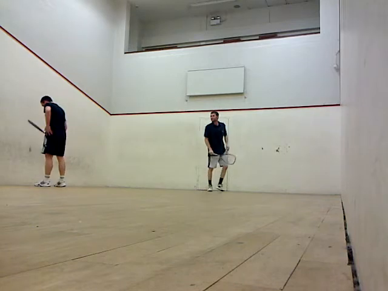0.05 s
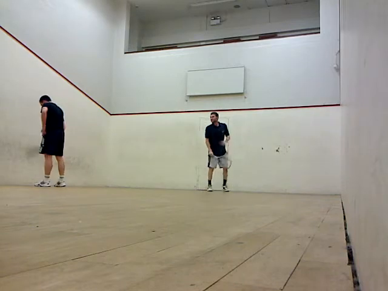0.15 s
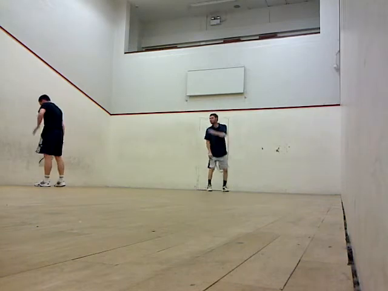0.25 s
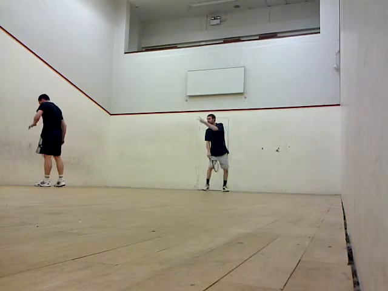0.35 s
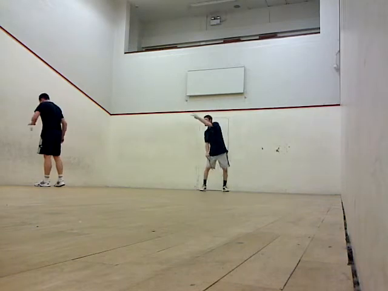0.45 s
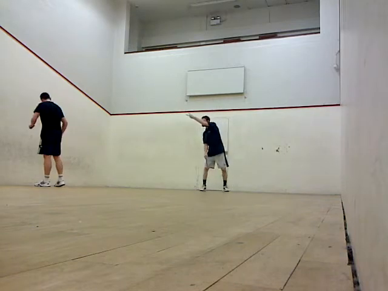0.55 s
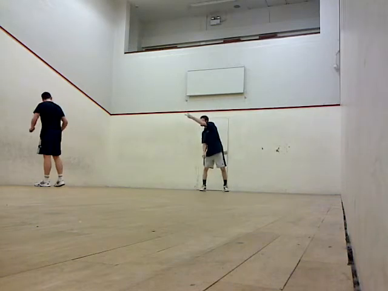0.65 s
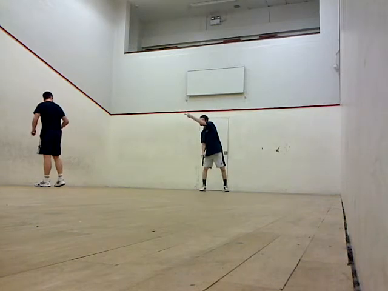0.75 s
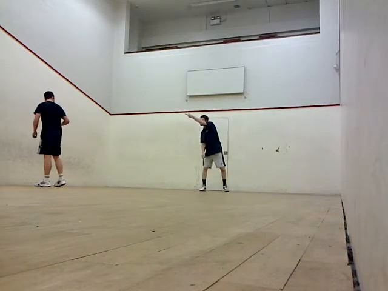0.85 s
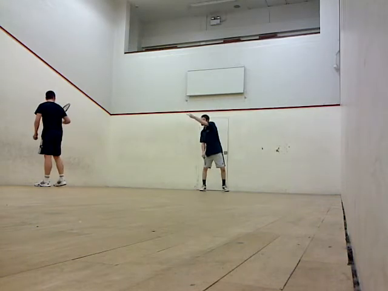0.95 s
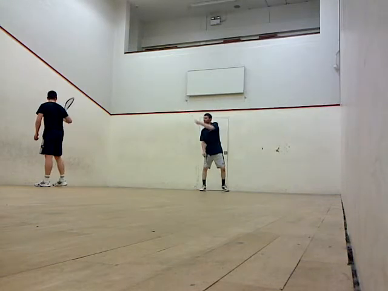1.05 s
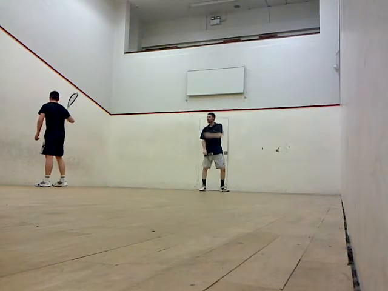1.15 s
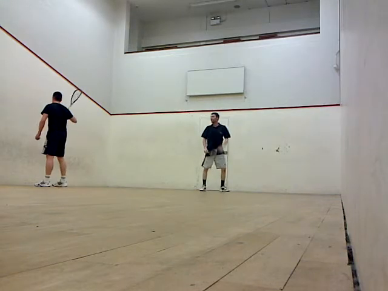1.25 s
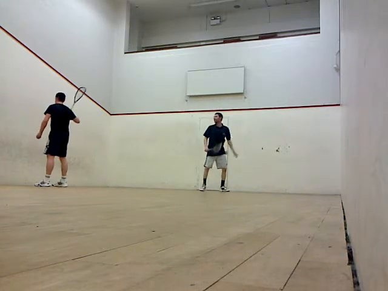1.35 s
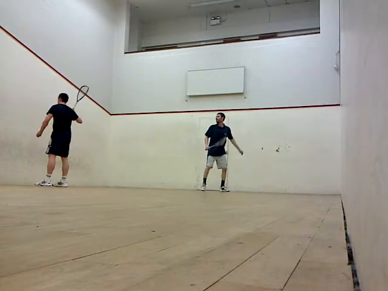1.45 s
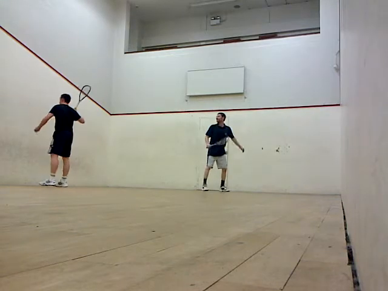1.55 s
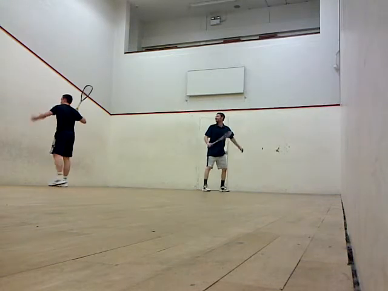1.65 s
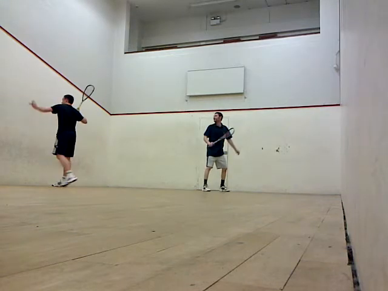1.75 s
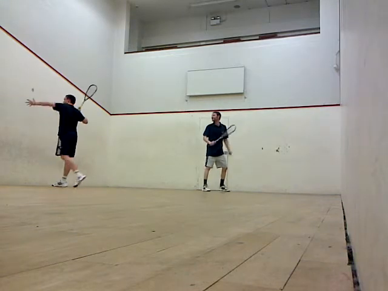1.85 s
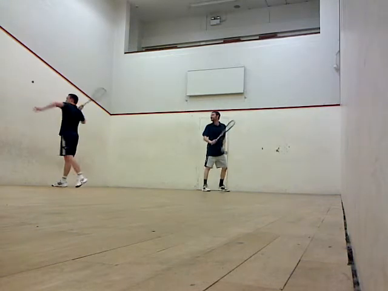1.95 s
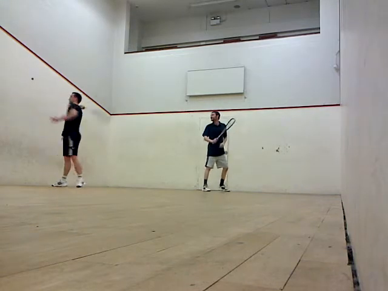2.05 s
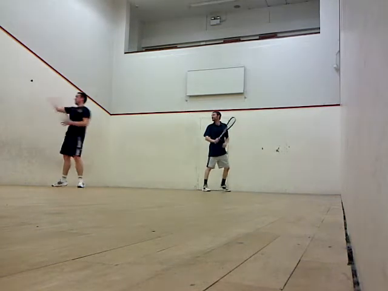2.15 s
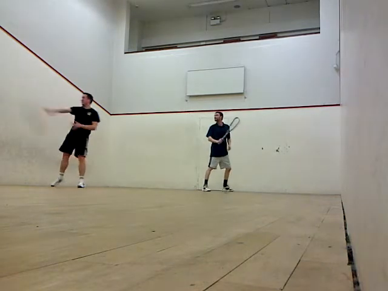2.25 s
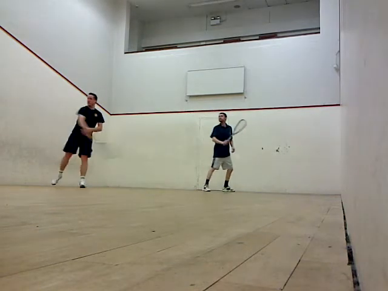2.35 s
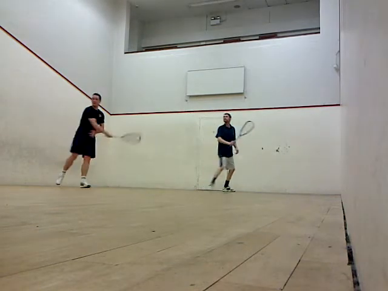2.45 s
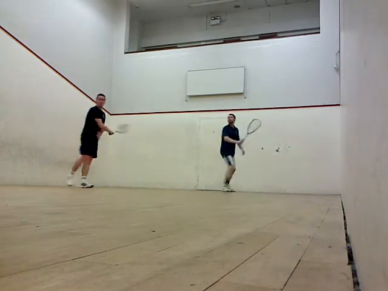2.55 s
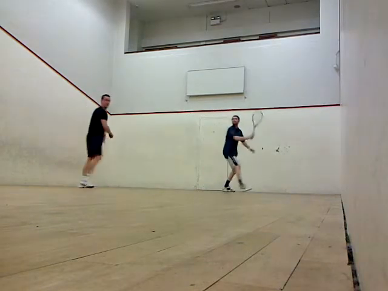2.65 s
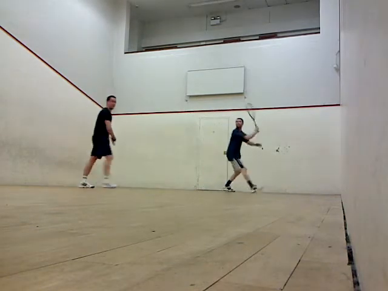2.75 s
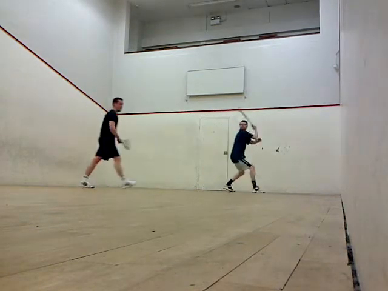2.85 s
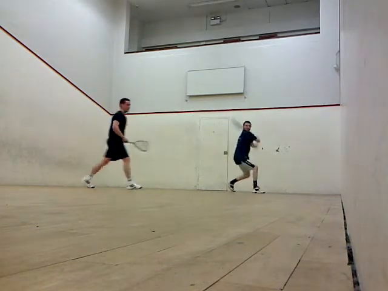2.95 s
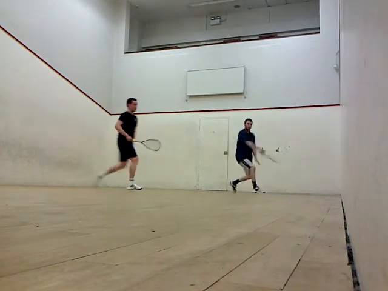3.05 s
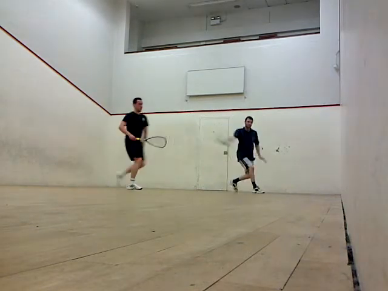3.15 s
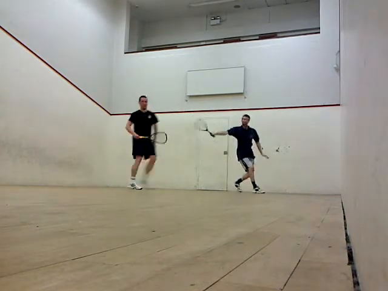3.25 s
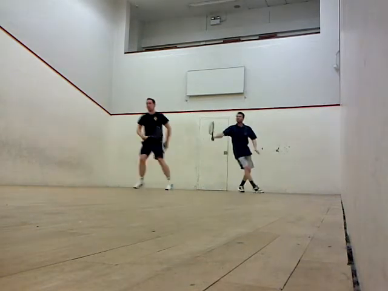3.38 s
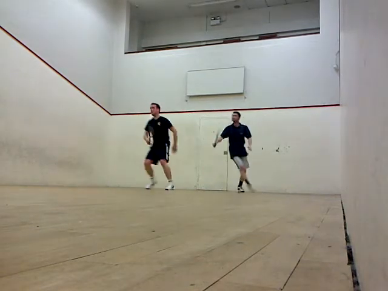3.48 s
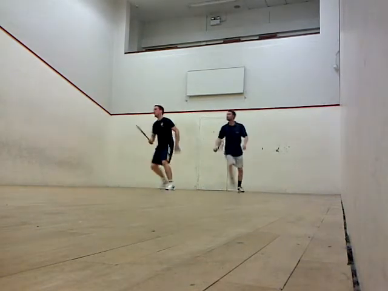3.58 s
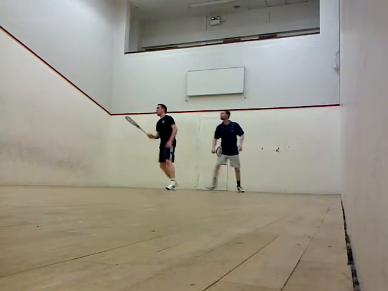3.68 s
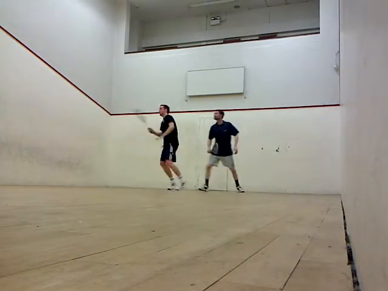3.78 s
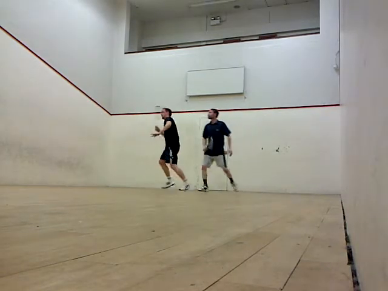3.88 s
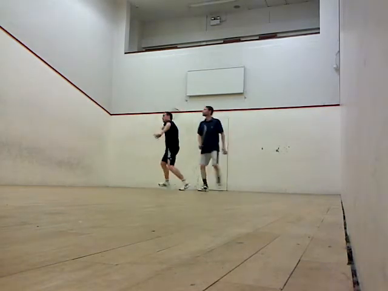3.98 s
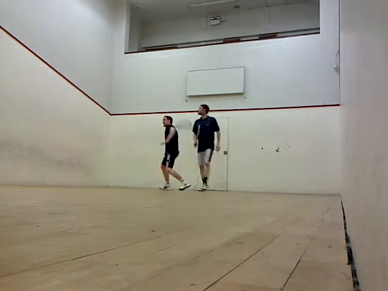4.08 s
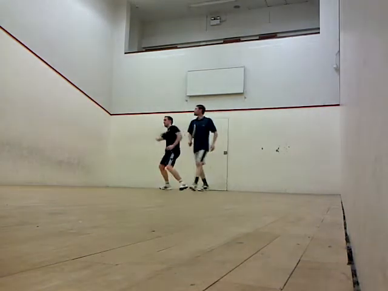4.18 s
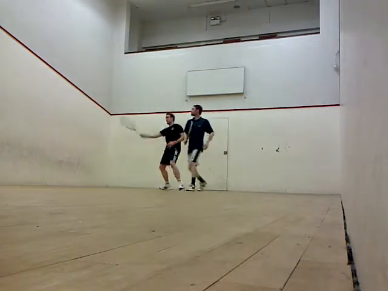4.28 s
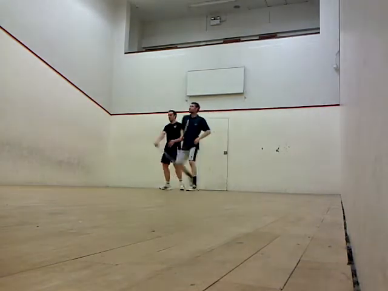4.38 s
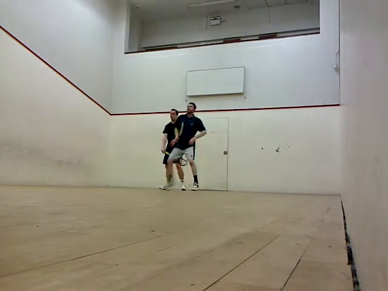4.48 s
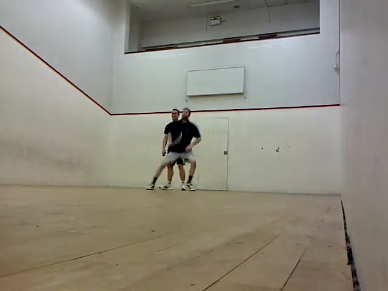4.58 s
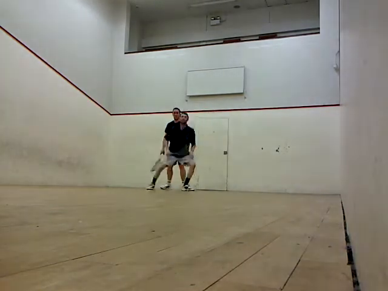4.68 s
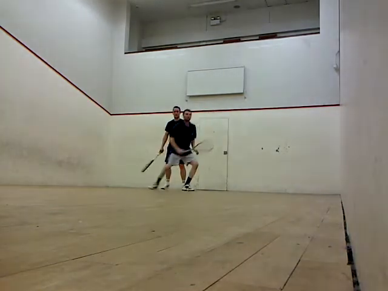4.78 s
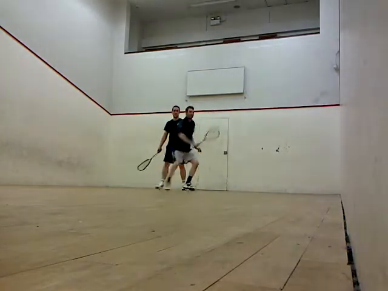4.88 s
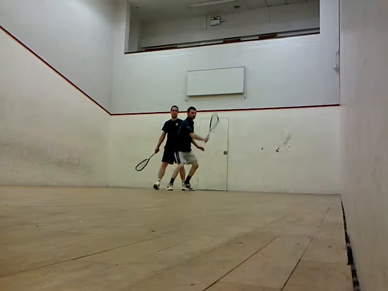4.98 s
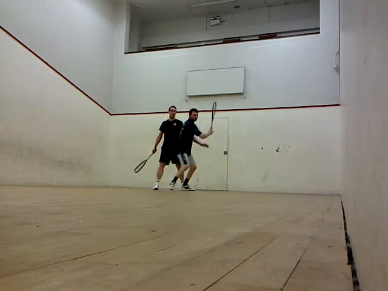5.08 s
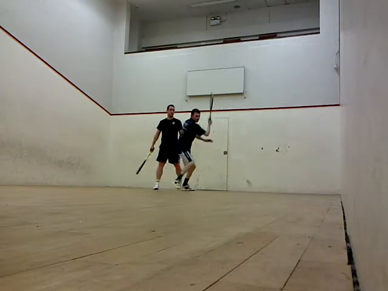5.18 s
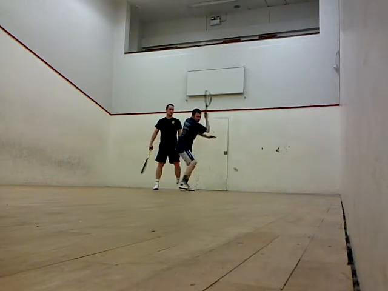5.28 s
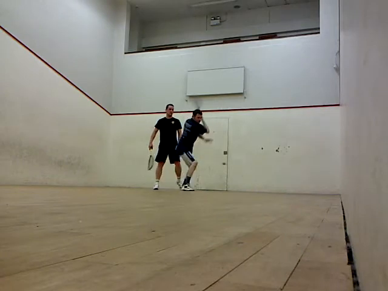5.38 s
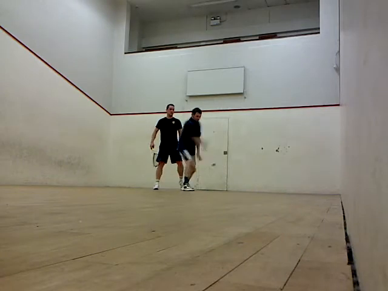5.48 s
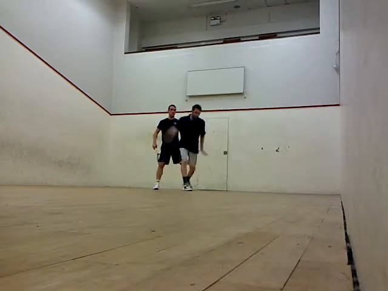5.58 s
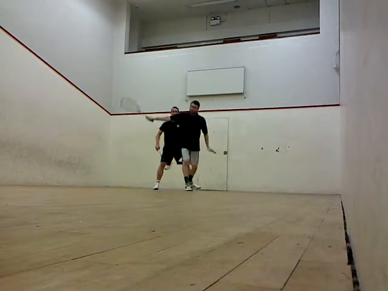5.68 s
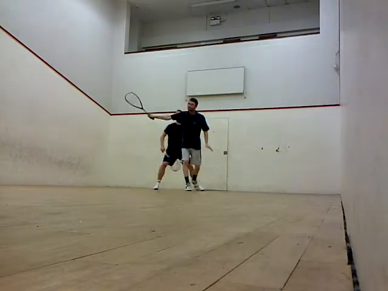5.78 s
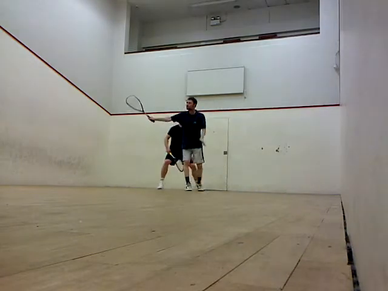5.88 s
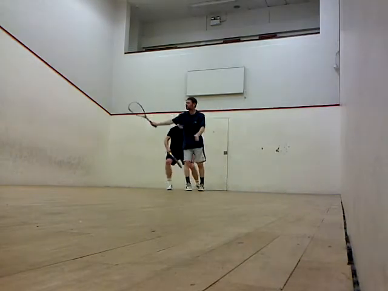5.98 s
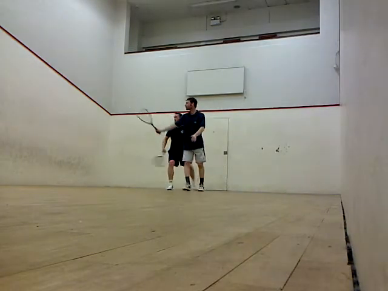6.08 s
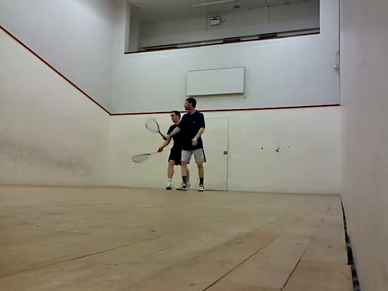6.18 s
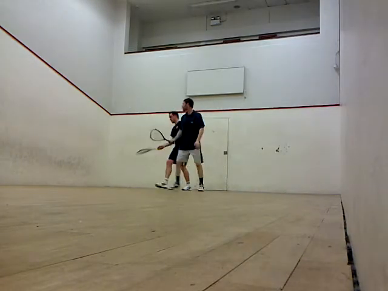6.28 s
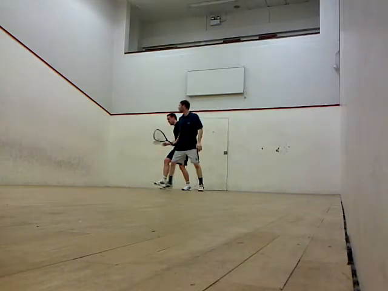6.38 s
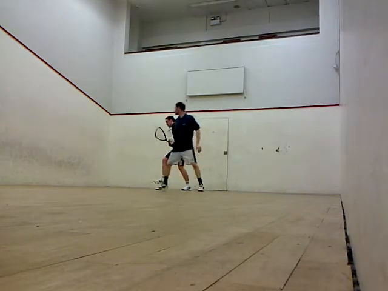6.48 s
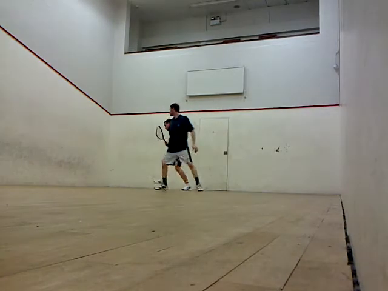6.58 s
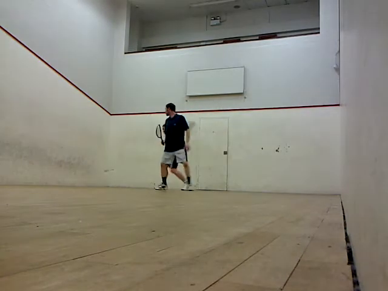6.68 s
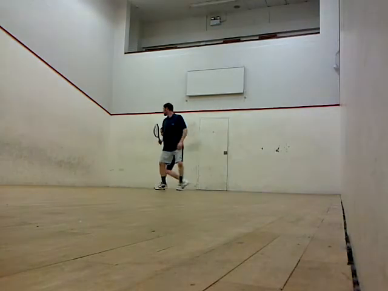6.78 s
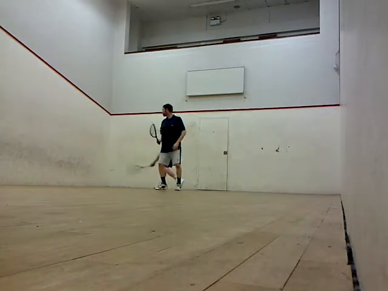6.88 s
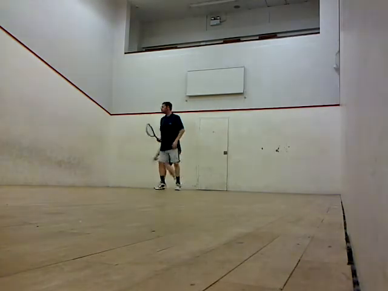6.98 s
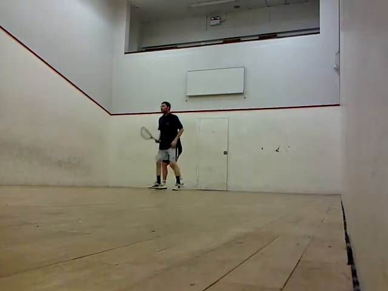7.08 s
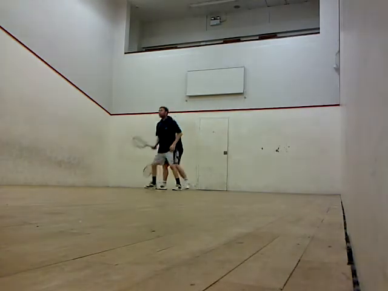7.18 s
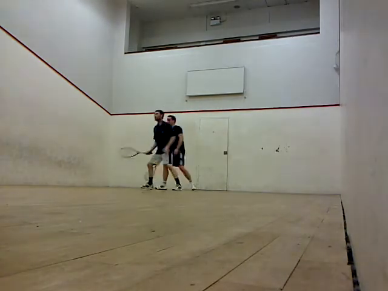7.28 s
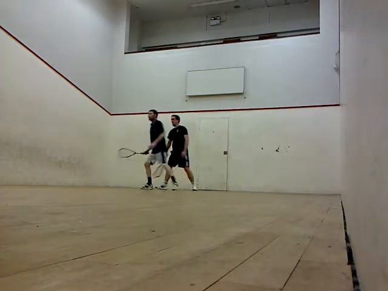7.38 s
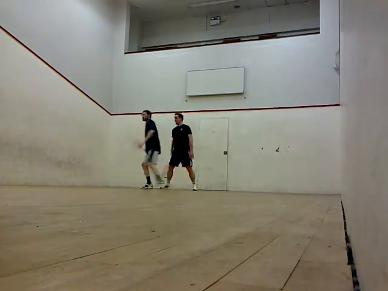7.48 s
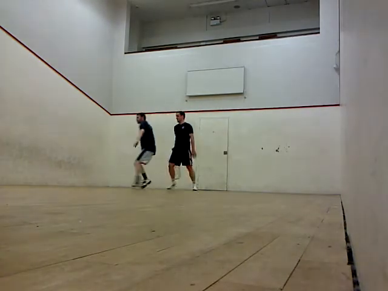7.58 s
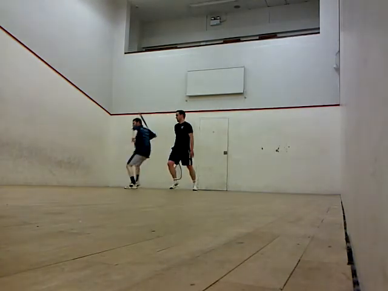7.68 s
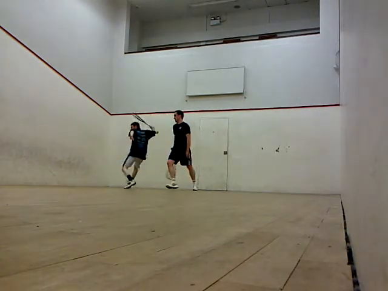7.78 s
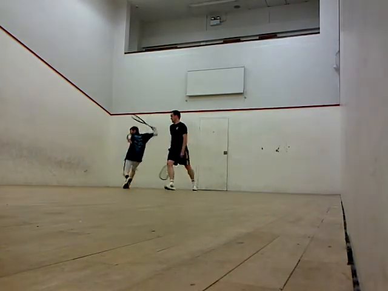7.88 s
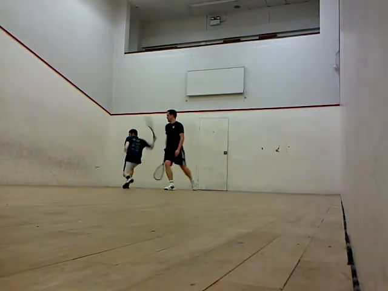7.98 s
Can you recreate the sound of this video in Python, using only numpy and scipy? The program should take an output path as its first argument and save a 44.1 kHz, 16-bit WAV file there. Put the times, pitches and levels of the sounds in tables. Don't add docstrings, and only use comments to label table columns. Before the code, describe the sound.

Two players rally on a wooden-floored squash court, heard from floor level by the front wall. A quiet opening with a ball bounce and faint scuffs gives way to regular pop-then-smack pairs, the wall hits harsh and overloaded. Reverberation fills the gaps, with short high shoe squeaks midway and near the end, plus thudding steps. The small microphone sounds thin, compressed and dull on top.

```python
import sys
import numpy as np
from scipy import signal
from scipy.fft import rfft, irfft, next_fast_len
from scipy.io import wavfile
from scipy.ndimage import uniform_filter1d

SR = 44100
rng = np.random.default_rng(int(sys.argv[2]) if len(sys.argv) > 2 else 0)


def wrap_up_sound(samples):
    columns = np.atleast_2d(samples).T
    tamed = np.clip(columns, -1, 1)
    steps = np.round(tamed * 32767).astype(np.int16)
    wavfile.write(sys.argv[1], SR, steps)


def gain_from_db(level_db):
    decades = np.asarray(level_db, float) / 20
    return 10 ** decades


N = 354123


def unit(x):
    return x / np.sqrt(np.mean(x ** 2) + 1e-20)


def along(points, hz):
    f, v = np.transpose(points)
    return np.interp(np.log(hz + 1), np.log(f + 1), v)


def filtered(x, response):
    m = next_fast_len(len(x) + 8192)
    spectrum = rfft(x, m) * response(np.fft.rfftfreq(m, 1 / SR))
    return irfft(spectrum, m)[:len(x)]


def add(track, start_s, sound):
    k = round(start_s * SR)
    sound = sound[max(-k, 0):N - k]
    track[max(k, 0):][:len(sound)] += sound


def court(rise_s, sparse_s):
    # f/Hz, t60/s
    decay = [(150, 2.5), (400, 2.93), (1000, 3.21), (2500, 2.98), (5000, 1.94), (8000, 1.34)]
    n = 5 * SR // 2
    t = np.arange(n) / SR
    density = np.clip((t / sparse_s) ** 2, 0.002, 1)
    hits = rng.random(n) < density
    echoes = rng.standard_normal(n) * hits / np.sqrt(density)
    hz, frame_s, z = signal.stft(echoes, SR, nperseg=256)
    z = z * gain_from_db(-60 * frame_s / along(decay, hz)[:, None])
    tail = signal.istft(z, SR, nperseg=256)[1][:n]
    return tail * (1 - np.exp(-(t / rise_s) ** 2))


def ring(colour, rise_s, sparse_s):
    tail = filtered(court(rise_s, sparse_s), colour)
    return tail / np.std(tail[SR // 10:SR // 4])


def blow(modes, crack_db, crack_hz, crack_t60_s):
    t = np.arange(SR // 10) / SR
    body = sum(gain_from_db(db - 60 * t / t60_s) * np.sin(2 * np.pi * hz * t) for hz, db, t60_s in modes)
    burst = gain_from_db(crack_db - 60 * t / crack_t60_s) * rng.standard_normal(len(t))
    burst[0] = 3 * gain_from_db(crack_db)
    crack = signal.lfilter(*signal.iirpeak(crack_hz, 1, SR), burst)
    return body * (1 - np.exp(-t / 0.00099)) + 2 * crack


def answers(start_s, sound, across_m, back_m, height_m, loss_db, beam_db):
    width_m, length_m, ceiling_m, sound_m_per_s = 6.48, 9.83, 5.88, 343
    ceiling_db = 2.2
    sides = np.array([across_m, 2 * width_m - across_m, 2 * width_m + across_m, 4 * width_m - across_m])
    ends = np.unique([back_m, 2 * length_m - back_m, 2 * length_m + back_m, 4 * length_m - back_m])[:, None]
    tops = np.array([height_m, 2 * ceiling_m - height_m, 2 * ceiling_m + height_m])
    metres = np.sqrt(sides[:, None, None] ** 2 + ends ** 2 + tops ** 2)
    walls = np.indices(metres.shape)
    gain_db = beam_db * ends / metres - loss_db * walls.sum(axis=0) - ceiling_db * walls[2]
    gains = metres.min() / metres * gain_from_db(gain_db)
    delays_s = (metres - metres.min()) / sound_m_per_s
    echoes = np.zeros(N)
    for delay_s, gain in zip(delays_s.ravel()[1:], gains.ravel()[1:]):
        add(echoes, start_s + delay_s, gain * sound)
    return echoes


def hall():
    # f/Hz, density/(dB per Hz)
    hum = [(59, -76), (100, -43.5), (146, -12), (271, -3.5), (337, 1.5), (658, -0.5), (864, -2),
           (1020, -4.5), (1950, -8), (2610, -17), (4330, -18), (7600, -38.5), (9880, -52), (16700, -120)]
    noise = rng.standard_normal(N)
    return gain_from_db(-38) * unit(filtered(noise, lambda hz: gain_from_db(along(hum, hz))))


def feet():
    # t/s, level/dB
    steps = [
        (0.051, -28),
        (0.402, -37),
        (2.949, -34.5),
        (3.699, -29),
        (4.1, -25.5),
        (5.299, -29),
        (6.601, -37),
        (6.798, -34.5),
        (7.55, -22.5),
        (7.898, -24),
    ]
    # f/Hz, density/(dB per Hz)
    boards = [(90, -8.5), (140, -2.5), (180, -8), (260, -5.5), (420, 3), (900, -27.5)]
    out = np.zeros(N)
    for start_s, db in steps:
        add(out, start_s, gain_from_db(db) * ring(lambda hz: gain_from_db(along(boards, hz)), rise_s=0.032, sparse_s=0.088))
    return out


def shoes():
    # t/s, length/s, start f/Hz, end f/Hz, level/dB
    squeaks = [
        (4.647, 0.016, 3840, 4210, -9),
        (4.984, 0.013, 3135, 3850, -10.5),
        (5.408, 0.003, 3980, 3680, -18),
        (5.989, 0.034, 4020, 4160, -23),
        (7.681, 0.025, 3690, 3980, -12),
        (7.686, .004, 4900, 4800, -16.5),
        (7.689, 0.0028, 5100, 5420, -14),
        (7.718, 0.0027, 4000, 4610, -13.5),
    ]
    # t/s, length/s, level/dB
    scuffs = [
        (1.309, .12, -46),
        (1.428, 0.089, -41),
        (1.885, 0.08, -44),
        (2.108, 0.003, -45),
        (2.126, 0.0014, -22),
        (6.82, 0.061, -39.5),
    ]
    glide = 0.55
    out = np.zeros(N)
    for start_s, length_s, start_hz, end_hz, db in squeaks:
        octave_db = -14 + 408 * length_s
        u = np.linspace(0, 1, round(length_s * SR))
        waver = uniform_filter1d(rng.standard_normal(len(u)), size=60)
        slip_hz = (start_hz + (end_hz - start_hz) * u ** glide) * (1 + 0.045 * waver)
        phase = 2 * np.pi * np.cumsum(slip_hz) / SR
        tone = np.sin(phase) + gain_from_db(octave_db) * np.sin(2 * phase)
        chirp = gain_from_db(db) * np.sin(np.pi * u) ** 0.28 * tone
        add(out, start_s, 2.0 * np.diff(chirp))
        add(out, start_s, gain_from_db(-28.0) * signal.fftconvolve(chirp, court(rise_s=0.008, sparse_s=0.15)))
    for start_s, length_s, db in scuffs:
        n = round(length_s * SR)
        noise = rng.standard_normal(n + 1)
        grit = (noise[1:] - 0.15 * noise[:-1]) * np.hanning(n)
        add(out, start_s, gain_from_db(db) * grit)
        add(out, start_s, gain_from_db(db - 32) * signal.fftconvolve(grit, court(rise_s=0.025, sparse_s=0.037)))
    return out


def bounce():
    # f/Hz, level/dB, t60/s
    modes = [(357, 7, 0.022), (560, -8, 0.023), (1250, 2.5, 0.015), (1710, -2, 0.017)]
    # f/Hz, density/(dB per Hz)
    after = [(59, -73), (100, -48), (203, -5.5), (247, -6), (337, 1), (590, -4), (658, -9.5), (1090, -10),
             (2260, -18.5), (2910, -19.5), (7600, -27), (9880, -85), (16700, -120)]
    # f/Hz, density/(dB per Hz)
    earlier = [(59, -71), (100, -30), (185, -7.5), (281, -3.5), (484, -11.5), (721, -9.5), (946, -16.5),
               (1600, -20), (7600, -31), (9880, -60), (16700, -120)]
    start_s, db, crack_db = 0.2592, -8.5, -21.5
    loss_db, echo_db, brighter_db = 1.2, -0.6, 14.7
    out = np.zeros(N)
    add(out, -0.3, gain_from_db(-17.5) * ring(lambda hz: gain_from_db(along(earlier, hz)), rise_s=0.03, sparse_s=0.1))
    add(out, start_s, gain_from_db(-20.0) * ring(lambda hz: gain_from_db(along(after, hz)), rise_s=0.021, sparse_s=0.12))
    add(out, start_s, gain_from_db(db) * blow(modes, crack_db, crack_hz=4800, crack_t60_s=0.014))
    echo = gain_from_db(db + echo_db) * blow(modes, crack_db + brighter_db, crack_hz=4800, crack_t60_s=0.021)
    return out + answers(start_s, echo, across_m=5.6, back_m=5.9, height_m=0.15, loss_db=loss_db, beam_db=0)


def rackets():
    # t/s, blow level/dB, crack level/dB, ring level/dB
    strokes = [
        (2.2674, 4.5, -19.5, -7.5),
        (3.1686, 5, -7.5, -4.5),
        (4.3644, 6.5, -17, -9),
        (5.6097, 3.5, -17.5, -10),
        (6.9602, 2.5, -15.5, -10),
    ]
    spots = [(5.52, 7.06, 0.76), (2.4, 6.6, 1.1), (3.54, 6.7, 2.5), (6.01, 5.4, 0.32), (4.92, 7.01, 0.74)]
    # f/Hz, level/dB, t60/s
    strings = [(469, 4.5, 0.019), (650, 7.5, 0.013), (780, -5, 0.017), (1179, 4.5, 0.013),
               (1545, 2, 0.0087), (2020, -8.5, 0.0031)]
    # f/Hz, density/(dB per Hz)
    after = [(59, -82.5), (100, -50.5), (291, -3), (458, 3.5), (549, -8), (818, -2), (963, -8),
             (2260, -17.5), (4100, -14.5), (6940, -23), (7600, -27), (9880, -66.5), (16700, -120)]
    loss_db, echo_db, brighter_db = 3.4, 0.52, 0.89
    out = np.zeros(N)
    for (start_s, db, crack_db, ring_db), spot in zip(strokes, spots):
        add(out, start_s, gain_from_db(db) * blow(strings, crack_db, crack_hz=5750, crack_t60_s=0.037))
        tail = ring(lambda hz: gain_from_db(along(after, hz)), rise_s=0.0072, sparse_s=0.052)
        add(out, start_s, gain_from_db(ring_db) * tail)
        echo = gain_from_db(db + echo_db) * blow(strings, crack_db + brighter_db, crack_hz=4470, crack_t60_s=0.017)
        out = out + answers(start_s, echo, *spot, loss_db, beam_db=0)
    return out


def front_wall():
    # t/s, blow level/dB, crack level/dB, ring level/dB, contact notch f/Hz
    smacks = [
        (2.3843, 18.5, -6.5, -3, 1350),
        (3.3386, 15.5, -9, -3.5, 1250),
        (4.5284, 19, -5, -8, 1175),
        (5.7277, 18, -7, -5, 1580),
        (7.129, 17, -9.5, -1, 1358),
    ]
    spots = [(4.08, 2.84), (3.96, 3.04), (1.8, 1.92), (3.8, 1.68), (5.16, 1.68)]
    # f/Hz, level/dB, t60/s
    plaster = [(467, -1.5, 0.017), (768, 4.5, 0.011), (1866, -4, 0.011)]
    # f/Hz, density/(dB per Hz)
    after = [(100, -34), (165, -26), (250, -13.5), (340, -3), (480, -1), (650, -1.5), (850, 0.5),
             (1300, -6.5), (1900, -8), (2700, -18), (4500, -20.5), (7600, -20.5)]
    loss_db, echo_db, brighter_db = 2.3, 3.5, -2
    back_wall_s = 0.041
    out = np.zeros(N)
    for (start_s, db, crack_db, ring_db, notch_hz), (across_m, height_m) in zip(smacks, spots):
        notch_db = 11.5 + 0.76 * (db - 15)
        colour = lambda hz: gain_from_db(along(after, hz) - notch_db / (1 + ((hz - notch_hz) / 160) ** 2))
        stiffer = (notch_hz / 1350) ** 0.62
        modes = [(hz * stiffer, level_db, t60_s) for hz, level_db, t60_s in plaster]
        add(out, start_s, gain_from_db(db) * blow(modes, crack_db, crack_hz=4230, crack_t60_s=0.0077))
        add(out, start_s + back_wall_s, gain_from_db(ring_db) * ring(colour, rise_s=0.0079, sparse_s=0.1))
        echo = gain_from_db(db + echo_db) * blow(modes, crack_db + brighter_db, crack_hz=5130, crack_t60_s=0.0092)
        out = out + answers(start_s, echo, across_m, 0, height_m, loss_db, beam_db=4.2)
    return out


def scene():
    return (hall() + feet() + shoes() + bounce() + rackets() + front_wall())[None]


def squeeze(x, window_s, knee_db, ratio, release_db_per_s, attack_s):
    fall_db = release_db_per_s * np.arange(N) / SR
    level = np.abs(uniform_filter1d(np.abs(x), 1 + round(window_s * SR)))
    level_db = np.maximum.accumulate(20 * np.log10(level + 1e-9) + fall_db) - fall_db
    cut_db = np.maximum(level_db - knee_db, 0) * (1 - 1 / ratio)
    keep = np.exp(-1 / (attack_s * SR))
    return x * gain_from_db(-signal.lfilter([1 - keep], [1, -keep], cut_db))


def roll_off(x):
    return signal.sosfilt(signal.butter(12, 15900, fs=SR, output="sos"), x)


def record(dry):
    # f/Hz, level/dB
    skirt = [(8000, -8.5), (8300, -8.5), (8600, -20), (9000, -36), (9300, -59.5)]
    rate_hz = 16000
    bass_cut = signal.butter(4, 170, "high", fs=SR, output="sos")
    x = signal.sosfilt(bass_cut, dry[0])
    x = squeeze(x, window_s=0.0088, knee_db=-20.5, ratio=4.35, release_db_per_s=19, attack_s=0.012)
    x = squeeze(x, window_s=0, knee_db=-5.5, ratio=2.93, release_db_per_s=294, attack_s=0.00057)
    x = x / (1 + np.abs(x / 1.04) ** 4) ** (1 / 4)
    x = signal.sosfilt(bass_cut, x)
    grumble = unit(filtered(rng.standard_normal(N), lambda hz: hz < 130))
    x = x + gain_from_db(-45.5) * grumble * uniform_filter1d(np.abs(x), size=500)
    x = filtered(x, lambda hz: 1 / (1 + (hz / 7800) ** 90))
    mirror = 2 * x * np.cos(2 * np.pi * rate_hz * np.arange(N) / SR)
    x = x + filtered(mirror, lambda hz: gain_from_db(along(skirt, hz)) * (hz > rate_hz / 2) * (hz < 9600))
    return roll_off(np.clip(x, -0.72, 0.72))


dry = scene()
out = record(dry)
wrap_up_sound(out)
```